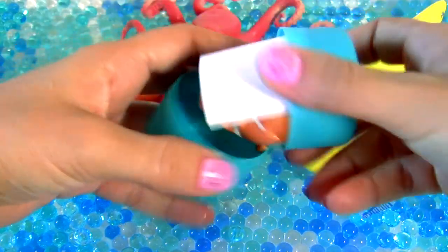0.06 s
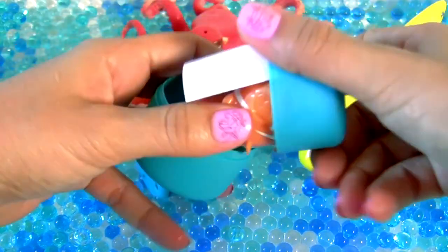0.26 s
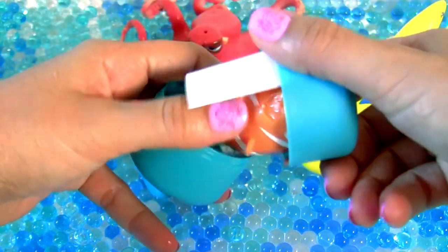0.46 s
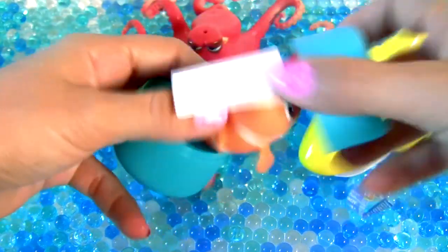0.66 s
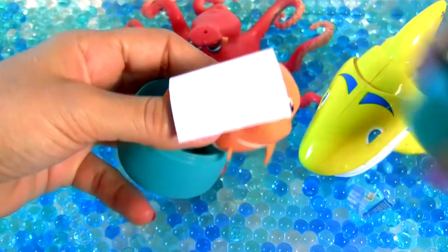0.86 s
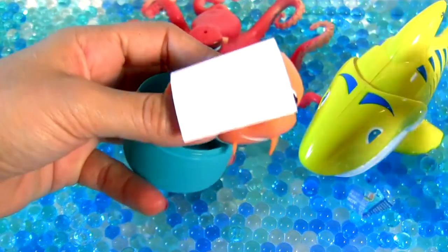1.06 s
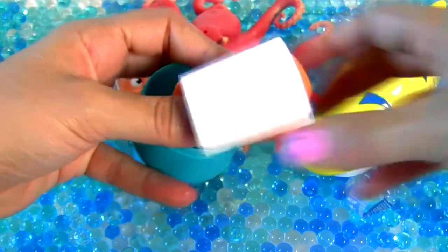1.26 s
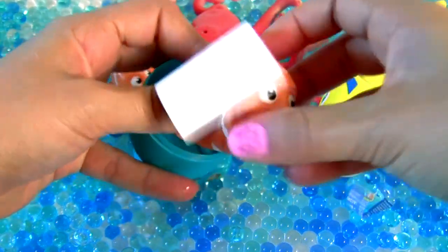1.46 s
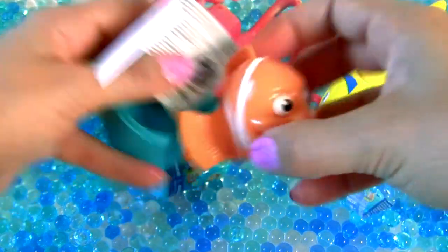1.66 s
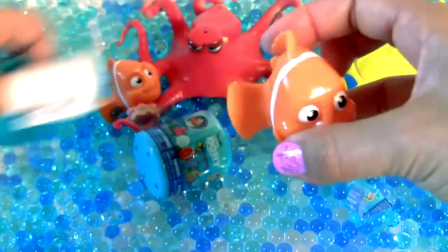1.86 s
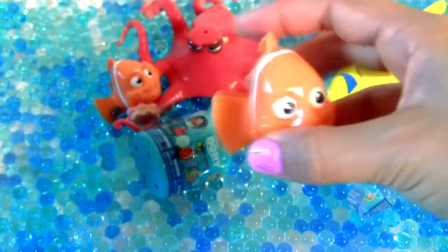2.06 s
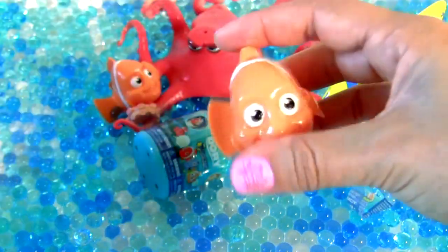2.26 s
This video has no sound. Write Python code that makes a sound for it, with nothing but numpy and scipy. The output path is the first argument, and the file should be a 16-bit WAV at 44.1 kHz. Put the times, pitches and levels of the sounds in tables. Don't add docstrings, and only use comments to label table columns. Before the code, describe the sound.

A plastic capsule rubs, ticks and pops apart in hands, followed by one hard, hollow knock

```python
import sys
import numpy as np
from scipy import signal
from scipy.fft import rfft, irfft
from scipy.io import wavfile
from scipy.ndimage import uniform_filter1d

SR = 44100
rng = np.random.default_rng(int(sys.argv[2]) if len(sys.argv) > 2 else 0)


def store_wav(level_fs):
    pcm = np.round(np.clip(np.atleast_2d(level_fs), -1, 1) * 32767)
    wavfile.write(sys.argv[1], SR, pcm.T.astype(np.int16))


def boost(x):
    u = np.asarray(x, float) / 20
    return 10 ** u


N = 101297


def unit(x):
    return x / np.sqrt(np.mean(x ** 2))


def band(x, hz, width_hz):
    return signal.lfilter(*signal.iirpeak(hz, hz / width_hz, fs=SR), x)


def double_band(x, hz, width_hz):
    return band(band(x, hz, width_hz), hz, width_hz)


def colour(x, table):
    n = x.shape[-1]
    hz = np.arange(n // 2 + 1) * SR / n + 1
    points = np.array(table)
    gain = boost(np.interp(np.log(hz), np.log(points[:, 0]), points[:, 1]))
    return irfft(rfft(x) * gain, n)


def walk(rate):
    hold = int(SR / rate)
    return unit(uniform_filter1d(rng.standard_normal(N)[np.arange(N) // hold], hold))


def add(out, x, s):
    i = max(int(s * SR), 0)
    out[i:i + len(x)] += x[:N - i]


def fade(t, t60):
    return boost(-60 * t / max(t60, .002))


def place(x, pan_db):
    lag_s = .000016
    hz = np.arange(N // 2 + 1) * SR / N
    late = irfft(rfft(x) * np.exp(-2j * np.pi * hz * lag_s), N)
    return np.array([late * boost(pan_db / 2), x * boost(-pan_db / 2)])


# frequency in Hz, density in dB per Hz.
AIR_MID = [(15, -30.5), (40, -7), (110, -6.5), (200, -11.5), (1200, -20), (2500, -28.5), (14300, -42),
           (15300, -61.5)]
# frequency in Hz, density in dB per Hz.
AIR_SIDE = [(15, -38), (25, -18.5), (76, -15.5), (384, -15.5), (476, -17), (531, -17), (1130, -22.5),
            (14000, -48), (16000, -66.5)]
# frequency in Hz, amplitude in dB.
HUM = [(29.3, -66.5), (58.6, -69.5), (118, -71)]
AIR_MID_DB, AIR_SIDE_DB = -58.5 - 4.5, -60.5


def air():
    t = np.arange(N) / SR
    mid = boost(AIR_MID_DB + .8 * walk(1.1)) * unit(colour(rng.standard_normal(N), AIR_MID))
    side = boost(AIR_SIDE_DB + .8 * walk(3.3)) * unit(colour(rng.standard_normal(N), AIR_SIDE))
    hum = sum(boost(db + 2.5 * walk(3.7)) * np.sin(2 * np.pi * hz * t) for hz, db in HUM)
    return mid + side * np.array([[1], [-1]]) + hum * boost(np.array([[-1.2], [1.2]]))


SLIPS_PER_S, SLIP_SCATTER_DB = 2800, 2.6


def slips():
    chance, sign, size = rng.random((3, N))
    happens = chance < SLIPS_PER_S / SR
    return unit(happens * np.sign(sign - .5) * boost(-SLIP_SCATTER_DB * np.log(size + 1e-9)))


# frequency in Hz, density in dB per Hz.
SKIN = [(300, -26), (1000, -14.5), (2500, -0.5), (4800, -8.5), (6500, -9.5), (8500, -9), (12000, -18),
        (16000, -19.5)]


def skin_hiss(grains):
    return np.diff(colour(grains, SKIN), prepend=0)


# centre in seconds, length in
# seconds, level in dB, ring in Hz, ring in dB.
BRUSHES = [(0.12, 0.017, -56, 1710, 2), (0.28, 0.026, -63, 2390, 4), (.778, 0.009, -48.5, 3000, 0),
           (.765, .04, -58, 8100, -7), (.735, 0.037, -60, 9400, -8), (0.89, 0.1, -72, 3680, -1),
           (1.196, 0.013, -56, 4200, -24), (1.407, 0.029, -50, 7400, -19), (1.63, 0.042, -63, 2460, -6),
           (1.7285, 0.004, -51.5, 5000, 6), (1.729, 0.0045, -55.5, 7650, 5), (1.73, 0.0055, -58, 3040, 6),
           (1.682, 0.0058, -65, 1070, 10), (1.733, .014, -47, 7800, -21), (1.709, 0.022, -49.5, 2200, -7),
           (2.058, 0.023, -64.5, 2800, -9), (2.233, .018, -60, 5500, -29),
           (0.0772, 0.0077, -60.5, 1820, 16.5), (0.241, 0.0065, -70, 1700, 15.5),
           (0.595, .008, -59.5, 2430, 10.5), (0.604, 0.016, -58.5, 4600, 3.5),
           (0.622, .008, -57.5, 2350, 16), (0.633, .005, -56.5, 2400, 14), (0.647, 0.0075, -56, 2300, 15),
           (.655, .012, -60, 2400, 13.5), (.61, 0.019, -63, 2550, 10), (.692, .008, -58, 2050, 15),
           (0.674, .006, -57, 2200, 14), (0.59, .006, -49.5, 2000, 2), (0.6, .006, -69.5, 2400, 16.5),
           (0.67, .006, -69.5, 2200, 16.5), (.526, .012, -74, 2540, 17), (0.5, 0.031, -79, 1600, 16.5),
           (.698, 0.009, -62, 4900, 14.5), (0.63, 0.0071, -58, 1700, 14), (.19, 0.0067, -68.5, 2500, 11.5),
           (.51, .03, -76, 600, 14), (.704, .003, -52, 4900, 8), (.607, .005, -60, 4400, 10),
           (.684, .004, -56, 4000, 6), (.67, .012, -62, 5000, 9), (.843, .004, -70, 900, 14),
           (.867, .004, -72, 900, 14), (1.1, .006, -77, 3600, 10), (1.304, .005, -76, 3600, 6),
           (1.472, .012, -68, 9000, 0), (1.377, .004, -54, 6000, 8), (1.3435, .002, -62, 2800, 14)]
CATCH_Q = 5


def scuffs():
    t, out = np.arange(N) / SR, np.zeros(N)
    grains = slips() + rng.standard_normal(N)
    hiss = unit(skin_hiss(grains))
    for s, length_s, db, hz, ring_db in BRUSHES:
        swell = np.exp(-(2 * (t - s) / length_s) ** 2)
        ring = unit(double_band(grains, hz, hz / CATCH_Q))
        out = out + boost(db) * swell * (hiss + boost(ring_db) * ring)
    return out


# time in seconds, level in dB.
RUB_TURN = [
    (0.09, -53),
    (0.098, -80),
    (0.112, -42.5),
    (0.222, -69),
    (0.246, -51.5),
    (0.302, -88),
    (0.352, -59),
    (0.42, -77),
]
# time in seconds, level in dB.
RUB_PULL = [(.435, -75), (.45, -62.5), (.49, -62.5), (.512, -57.5), (.54, -62), (.583, -60), (.605, -50),
            (.7, -44), (.716, -58), (.76, -60.5), (.82, -79)]
# frequency in Hz, width in Hz, level in dB.
TURN_BODY = [(960, 210, 3), (1348, 250, -1.5), (1710, 750, 3), (2500, 170, -3.5), (3600, 750, -7),
             (4700, 500, -6)]
# frequency in Hz, width in Hz, level in dB.
PULL_BODY = [(710, 890, -7), (1627, 290, 3), (2200, 280, -1), (2500, 150, 1), (3940, 520, -5),
             (4895, 750, -6.5)]
CATCH_PER_S, CATCH_DB = 120, 2.4
RUB_HISS_DB, RUB_TRIM_DB = -6.5, -2


def rub(pressure, body):
    points, grains = np.array(pressure), slips()
    shell = np.zeros(N)
    for k, (hz, width_hz, db) in enumerate(body):
        mode = band(band(grains, hz, width_hz), hz, 2 * width_hz)
        shell = shell + (-1) ** k * boost(db + CATCH_DB * walk(CATCH_PER_S)) * mode
    hiss = unit(skin_hiss(grains))
    db = np.interp(np.arange(N) / SR, points[:, 0], points[:, 1], left=-120, right=-120)
    level = boost(db + RUB_TRIM_DB + CATCH_DB * walk(CATCH_PER_S) / 2)
    return level * (unit(shell) + boost(RUB_HISS_DB) * hiss)


# start in seconds, level in dB, ring in Hz, t60 in seconds, treble in dB.
TICKS = [(.107, -40, 967, 0.017, -20), (0.115, -39.5, 1660, 0.04, 9.5), (0.145, -37.5, 1300, 0.046, -12),
         (.190, -46, 3600, 0.025, -7), (.251, -39, 1016, 0.024, -13), (.564, -40.5, 2140, 0.029, -20),
         (.689, -33, 4700, 0.012, -9), (0.7036, -22, 1980, 0.015, -7), (0.7305, -54, 3000, 0.008, 1.5),
         (0.824, -50, 3470, 0.023, -24), (.841, -46, 3460, 0.012, 0), (0.866, -39, 3450, 0.0051, -23),
         (1.3454, -26.5, 3640, 0.018, -18), (1.6165, -40, 3600, 0.033, -2), (1.679, -45, 5190, 0.033, -2),
         (1.7014, -25.5, 3920, 0.012, -17), (1.7017, -27.5, 1900, 0.012, -21),
         (1.7266, -35, 1684, 0.034, -8), (1.754, -48, 1200, 0.014, -17), (2.186, -51, 560, 0.08, -25),
         (2.214, -45.5, 1956, 0.025, 0), (2.237, -51, 2300, 0.032, 3)]
TICK_PUSH_S, TICK_RISE_S, TICK_Q = 0.00059, 0.00026, 6


def ticks():
    t, out = np.arange(SR // 10) / SR, np.zeros(N)
    rise = 1 - np.exp(-t / TICK_RISE_S)
    for s, db, hz, t60, treble_db in TICKS:
        contact, scrape = rng.standard_normal((2, len(t)))
        ring = band(contact * np.exp(-t / TICK_PUSH_S), hz, hz / TICK_Q)
        ring = ring + band(scrape * fade(t, t60), hz, hz / TICK_Q) / 2
        treble = np.diff(colour(scrape, SKIN) * fade(t, t60), prepend=0)
        tick = ring / abs(ring).max() + boost(treble_db) * treble / abs(treble).max()
        add(out, boost(db) * rise * tick, s)
    return out


# centre in seconds,
# level in dB, pulse in Hz.
SNAPS = [(.1135, -39, 3000), (.1468, -41, 1590), (.2515, -43, 1800), (.5172, -38.5, 2200),
         (.5661, -43, 2000), (.5936, -39, 3000), (.6205, -42, 1200), (.7313, -37, 1100), (.7375, -48, 1000),
         (1.3035, -54, 2500), (1.354, -47, 75), (1.3455, -26, 3600), (0.8417, -41, 3500),
         (2.2143, -52, 4000), (2.2372, -50, 5000), (1.6168, -41, 4000), (.7785, -42, 3000),
         (1.7549, -45.5, 2000)]


def snaps():
    t, out = np.arange(N) / SR, np.zeros(N)
    for s, db, hz in SNAPS:
        u = (np.pi * hz * (t - s)) ** 2
        out = out - boost(db) * (1 - 2 * u) * np.exp(-u)
    return out


# start in seconds, level in dB, ring in Hz, t60 in seconds.
THUDS = [
    (0.622, -51, 470, 0.016),
    (.684, -53, 920, 0.0074),
    (.779, -48.5, 802, 0.016),
    (1.619, -53, 490, .03),
    (1.702, -45, 800, 0.015),
    (1.703, -54.5, 223, 0.076),
    (1.727, -49, 490, .05),
    (1.727, -56.5, 221, 0.049),
    (2.216, -54, 733, 0.065),
    (2.235, -54.5, 994, 0.051),
]
THUD_Q = 5.1


def thuds():
    t, out = np.arange(SR // 10) / SR, np.zeros(N)
    for s, db, hz, t60 in THUDS:
        ring = double_band(rng.standard_normal(len(t)) * fade(t, t60), hz, hz / THUD_Q)
        add(out, boost(db) * ring / abs(ring).max(), s)
    return out


# frequency in Hz, level in dB, t60 in seconds.
SHELL = [(210, -24.5, 0.12), (262, -15, 0.059), (517, -10.5, .06), (711.6, -3.5, .05), (939, -8.5, .06),
         (1165, -5.5, .065), (1338, 1.5, .033), (1766, -2, .04), (1935, -3, 0.025), (2200, 13, 0.01),
         (2510, 4, 0.019), (2870, -6.5, .03), (5810, -8.5, .016), (7880, -15, .018)]
# frequency in Hz, level in dB, t60 in seconds.
TRAY = [(518, -30.5, 0.6), (478, -28, .25), (328, -27, .13), (554, -19, 0.17), (1097, -37.5, .5),
        (1162, -30, 0.5), (1266, -33, .5), (1676, -37, .4), (1794, -37, .5), (2560, -38, 0.36)]
# frequency in Hz, density in dB per Hz.
CRACK = [(2000, -6), (4000, 1.5), (9000, -1.5), (13000, -5.5), (16000, -9)]
KNOCK_S, KNOCK_DB, KNOCK_PUSH_S, KNOCK_PAN_DB = 1.3508, -5, .0013, -3.5
CRACK_DB, CRACK_T60_S, CRACK_WIDTH = -26.5, 0.03, .45
SPLIT_DB, SPLIT_S, SPLIT_LENGTH_S = -14, .0009, .0008
RIM_HZ = 1500


def knock():
    t = np.arange(SR // 2) / SR
    body, mid, side = np.zeros((3, N))
    ring = np.zeros(len(t))
    for hz, db, t60 in [*SHELL, *TRAY]:
        ring = ring + np.sign(RIM_HZ - hz) * boost(db) * fade(t, t60) * np.sin(2 * np.pi * hz * t)
    push = 1 - np.exp(-t / KNOCK_PUSH_S)
    noise = colour(rng.standard_normal(len(t)), CRACK)
    split = boost(SPLIT_DB) * np.exp(-((t - SPLIT_S) / SPLIT_LENGTH_S) ** 2)
    crack = push * (boost(CRACK_DB) * fade(t, CRACK_T60_S) + split)
    add(body, boost(KNOCK_DB) * ring / 2 * push, KNOCK_S)
    add(mid, crack * noise, KNOCK_S)
    add(side, crack * noise[::-1], KNOCK_S)
    return place(body + mid, KNOCK_PAN_DB) + CRACK_WIDTH * side * np.array([[1], [-1]])


# frequency in Hz, t60 in seconds.
ROOM = [(200, 0.083), (500, 0.52), (1100, .6), (2200, 0.4), (4000, 0.18), (8000, 0.38)]
ROOM_LATE_S, ROOM_LIKENESS, ROOM_Q = 0.002, 0.77, 1.4


def room(x, db, tint):
    t = np.arange(SR) / SR
    noise = colour(rng.standard_normal((3, SR)), tint)
    noise = np.sqrt(ROOM_LIKENESS) * noise[0] + np.sqrt(1 - ROOM_LIKENESS) * noise[1:]
    tail = sum(band(noise, hz, hz / ROOM_Q) * fade(t, t60) for hz, t60 in ROOM)
    tail = tail * (1 - np.exp(-(t / ROOM_LATE_S) ** 2))
    tail = tail / np.sqrt(np.sum(tail ** 2) / 2)
    return boost(db) * signal.fftconvolve(x[None], tail)[:, :N]


def microphone(near):
    return near - .75 * band(near, 6450, 1100)


# frequency in Hz, density in dB per Hz.
KNOCK_FAR = [(88, -39.5), (175, -13), (410, -20), (535, -2), (928, -16.5), (1140, -5), (1460, -10.5),
             (2590, -13.5), (14000, -45.5)]
KNOCK_ROOM_DB, HANDS_ROOM_DB, HANDS_PAN_DB = 1, -16.5, -2


def scene():
    hands = scuffs() + rub(RUB_TURN, TURN_BODY) + rub(RUB_PULL, PULL_BODY) + ticks() + snaps() + thuds()
    blow = 1. * (np.arange(N) == int(KNOCK_S * SR))
    near = place(hands, HANDS_PAN_DB) + knock()
    near = near + room(hands, HANDS_ROOM_DB, [(1000, 1), (16000, 2)])
    near = near + room(blow, KNOCK_ROOM_DB, KNOCK_FAR)
    return microphone(near) + air()


def band_limit(x):
    return signal.sosfilt(signal.butter(12, 16690, fs=SR, output="sos"), x)


def record(dry):
    top_hz = 16050
    cut = signal.sosfilt(signal.ellip(10, .3, 70, top_hz, fs=SR, output="sos"), dry)
    return band_limit(cut)


dry = scene()
out = record(dry)
store_wav(out)
```